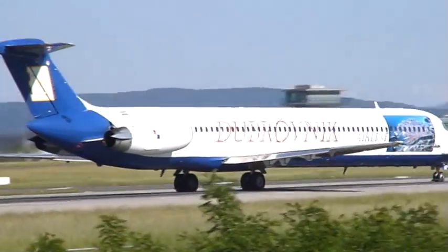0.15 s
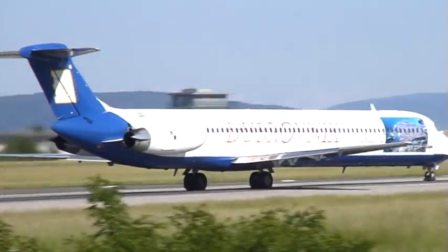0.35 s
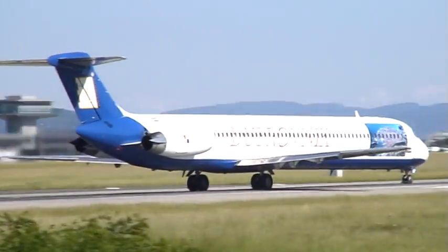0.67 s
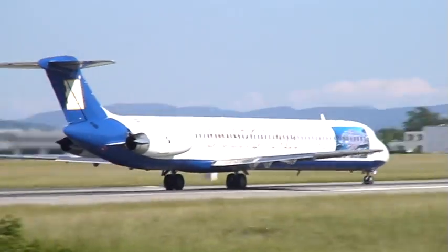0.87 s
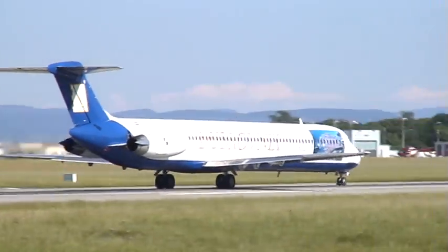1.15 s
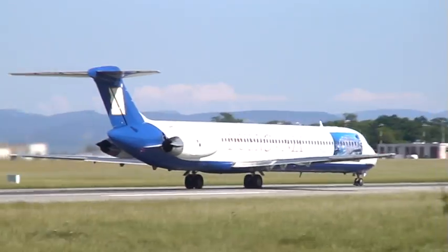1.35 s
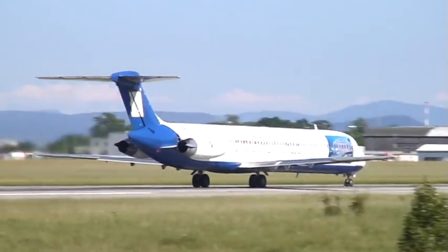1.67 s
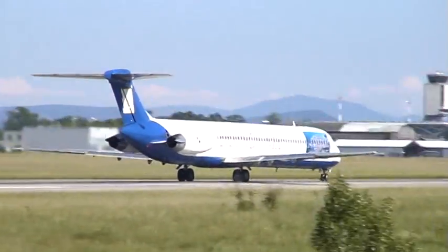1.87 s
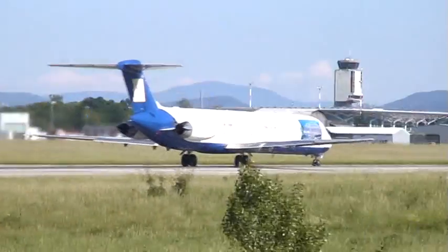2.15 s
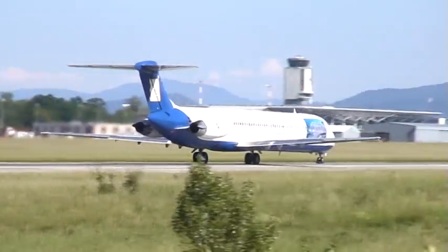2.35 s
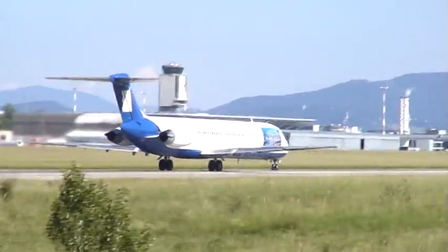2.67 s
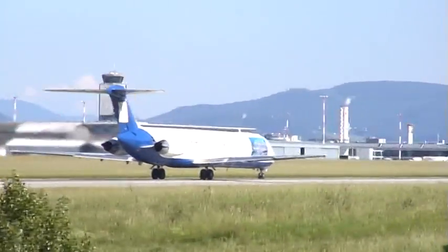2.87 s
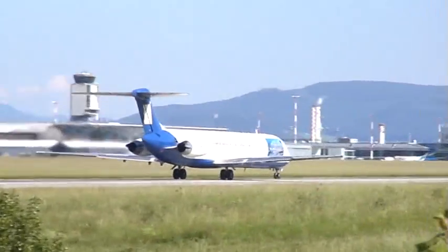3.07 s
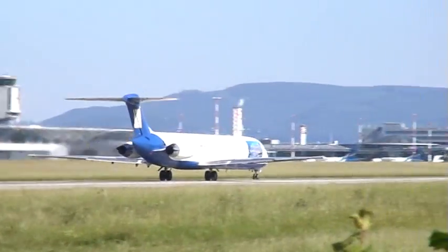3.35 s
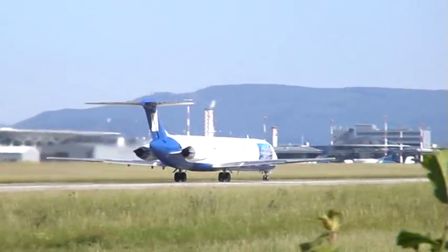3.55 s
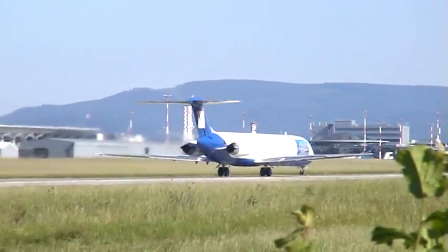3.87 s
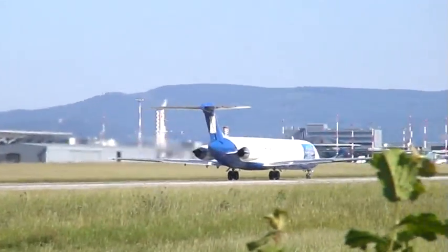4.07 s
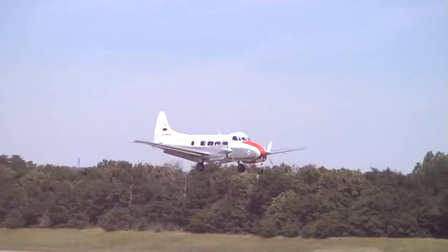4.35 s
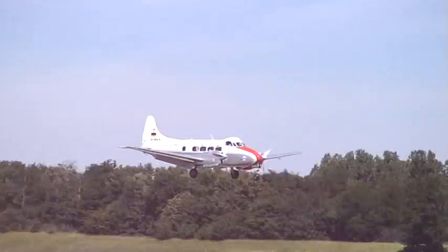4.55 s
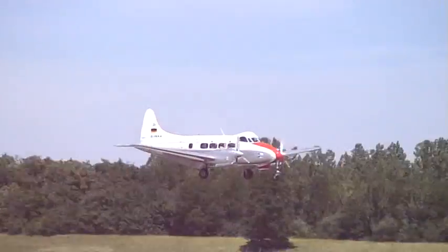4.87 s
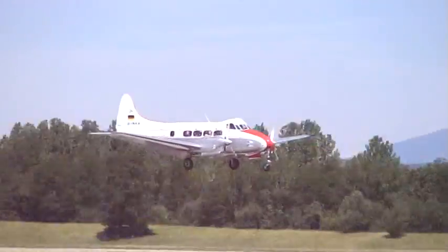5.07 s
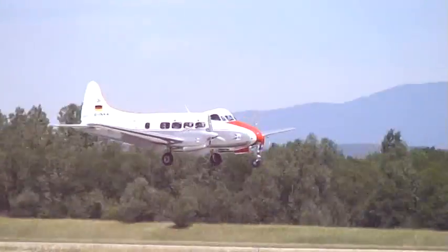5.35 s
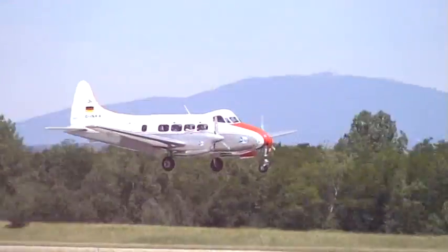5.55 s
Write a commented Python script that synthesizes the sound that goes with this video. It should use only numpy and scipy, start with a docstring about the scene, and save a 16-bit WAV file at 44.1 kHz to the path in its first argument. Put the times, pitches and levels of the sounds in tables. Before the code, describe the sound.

A jet airliner roars away down a runway, dulling into deep rumble, then a brief gap and a quieter propeller plane drones in with faint bird chirps.

```python
"""Departing jet, then a landing propeller plane

A twin-jet airliner rolls away down a runway: beamed bands of noise dull and the deep rumble grows as its tail turns this way.
After a moment of silence a six-cylinder propeller plane comes in to land: sine tones on its engine cycle plus puffing noise.
A small bird chirps nearby in gliding two-voiced sines, over a soft noise breeze and a short dry click."""
import sys
import numpy as np
from scipy import signal
from scipy.io import wavfile
from scipy.ndimage import uniform_filter1d, minimum_filter1d

SR = 44100
rng = np.random.default_rng(int(sys.argv[2]) if len(sys.argv) > 2 else 0)


def store_wav(level_fs):
    """Save 16-bit WAV to argv[1]."""
    pcm = np.round(np.clip(np.atleast_2d(level_fs), -1, 1) * 32767)
    wavfile.write(sys.argv[1], SR, pcm.T.astype(np.int16))


N = 251370
T = np.arange(N) / SR
JET_END_S, PLANE_START_S = 4.193, 4.2805


def from_db(db):
    """Decibels to gain."""
    return 10 ** (np.asarray(db) / 20)


def rms_one(x):
    """Scale to unit power."""
    return x / np.sqrt(np.mean(x ** 2) + 1e-20)


def in_time(rows):
    """Each column of a timed curve at every sample."""
    s, *columns = np.transpose(rows)
    return [np.interp(T, s, column) for column in columns]


def at_hz(points, hz):
    """Read a spectrum on a log-frequency axis."""
    table_hz, values = np.transpose(points)
    return np.interp(np.log(hz), np.log(table_hz), values)


def bump(offset, width):
    """A smooth hill of height 1."""
    return np.exp(-(offset / width) ** 2)


def drift(rate_hz):
    """Slow random wandering with spread 1, made at a hundredth of the sample rate."""
    pole = np.exp(-200 * np.pi * rate_hz / SR)
    white = rng.standard_normal(N // 100 + 1002)
    slow = signal.lfilter([1], [1, -2 * pole, pole * pole], white)[1000:]
    return np.interp(np.arange(N) / 100, np.arange(len(slow)), rms_one(slow))


def bands(lowest_hz, count):
    """Third-octave bands, each a pair of unrelated noises of equal power per Hz."""
    white = rng.standard_normal((2, 2, N + SR // 2))
    for k in range(count):
        low, high = lowest_hz * 2 ** (np.array([k, k + 1]) / 3)
        band = signal.butter(3, [low, high], "band", fs=SR, output="sos")
        # neighbouring bands draw on different noise; the filter's first half second is dropped
        yield np.sqrt(low * high), signal.sosfilt(band, white[k % 2])[..., -N:]


def pan(db):
    """Left and right gains for a left-minus-right level difference."""
    gains = from_db(np.array([[db], [-db]]) / 2)
    return gains / gains.mean()


def stereo(pair, alike, lead_s=0):
    """Mix two noises into left and right with a given likeness and lead of the left side."""
    alike = np.clip(alike, 0, .99)
    shared = np.sqrt((1 + alike) / 2) * pair[0]
    opposed = np.sqrt((1 - alike) / 2) * pair[1]
    left, right = shared + opposed, shared - opposed
    return np.array([left, np.roll(right, int(round(lead_s * SR)))])


def delayed(x, seconds):
    """The same sound a little later."""
    return np.array([np.interp(T - seconds, T, channel, left=0) for channel in x])


def evened(x, size):
    """Divide out the running loudness, so that the power stays even."""
    return x / np.sqrt(uniform_filter1d(np.mean(x ** 2, axis=0), size=size) + 1e-20)


def centred(db, heard):
    """A level relative to its mean while its scene is heard."""
    return db - np.mean(db[heard])


# Phase between the two microphone capsules. Each row: frequency in Hz, lead of the left in radians.
CAPSULE_PHASE = [(75, 1), (115, -1.88), (230, -1.21), (450, -1.06), (620, -0.069), (1000, -0.66),
                 (1400, 0.71), (1800, 0.54), (3300, -0.2)]


def capsule_lead(hz):
    """Seconds by which the left capsule leads at a frequency."""
    return at_hz(CAPSULE_PHASE, hz) / (2 * np.pi * hz)


# The airliner's path: distance to the runway, how far past it is at the start, its speed.
RUNWAY_M, PAST_M, SPEED_M_PER_S = 174, 78.4, 56.2


def rolling_away(beam_deg, width_deg):
    """Level change in dB of one exhaust beam as the airliner recedes and its tail turns this way."""
    along_m = PAST_M + SPEED_M_PER_S * T
    off_axis_deg = np.degrees(np.arctan2(RUNWAY_M, along_m))
    spreading_db = -20 * np.log10(np.hypot(RUNWAY_M, along_m))
    # the beam is 3 dB down at its width
    beam_db = -10 * np.log10(2) * ((off_axis_deg - beam_deg) / width_deg) ** 2
    return centred(spreading_db + beam_db, T < JET_END_S)


def hiss():
    """Faint, steady white noise under the airliner."""
    return from_db(-67.5) * stereo(rng.standard_normal((2, N)), alike=0.57)


# Colour of the moving air. Each row: frequency in Hz, relative level in dB per Hz.
BREEZE_COLOUR = [(20, -16), (36, -3), (55, -2), (85, -3), (140, 0), (280, -9.5)]
# Soft gusts on the field. Each row: centre in seconds, length in seconds, centre in Hz, lift in dB.
GUSTS = [(4.49, 0.1, 58, 14), (4.73, 0.062, 95, 11), (4.9, 0.07, 50, 7)]


def breeze(calm_db=-49.5):
    """Soft low rumble of moving air; each gust lifts its own part of the bass."""
    calm, out = 0, 0
    for hz, pair in bands(20.4, count=12):
        air = from_db(at_hz(BREEZE_COLOUR, hz)) * stereo(pair, 0.2)
        gust_db = 0
        for s, length, centre_hz, db in GUSTS:
            gust_db = gust_db + db * bump(T - s, length) * bump(np.log2(hz / centre_hz), 0.98)
        calm = calm + air
        out = out + from_db(gust_db) * air
    return from_db(calm_db) * out / np.std(calm)


# Short dry clicks; scene() mutes those before the propeller plane. Each row: start in seconds, level in dB.
CLICKS = [(2.2508, -49), (3.6765, -48), (5.6778, -39)]
# What they ring with. Each row: frequency in Hz, relative level in dB, 60 dB decay time in seconds.
CLICK_MODES = [(900, 8.5, 0.02), (4700, -1, 0.007), (6000, -4, 0.007), (7500, -4, 0.0068),
               (11700, -6, 0.004)]


def click(right_db=6, crack_db=-1.0, crack_t60_s=0.005):
    """Short dry clicks, each doubled: a noise crack over a few ringing modes."""
    out = np.zeros(N)
    age = np.arange(SR // 60) / SR
    highpass = signal.butter(2, 4000, "high", fs=SR, output="sos")
    for s, db in CLICKS:
        for delay_s, copy_db in [(0, 0), (0.0011, -2)]:
            crack = signal.sosfilt(highpass, rng.standard_normal(len(age)))
            crack = crack * from_db(crack_db - 60 * age / crack_t60_s)
            ring = sum(from_db(mode_db - 60 * age / t60_s) * np.sin(2 * np.pi * hz * age)
                       for hz, mode_db, t60_s in CLICK_MODES)
            burst = from_db(db + copy_db) * (ring + crack)
            out += np.interp(T - s - delay_s, age, burst, left=0, right=0)
    return out * pan(-right_db)


# Chirps on four-point pitch glides. Each row: start in seconds, length in seconds, start, top, low and end
# pitch in Hz, level in dB, warble spread in Hz, second voice in dB relative to the first.
CHIRPS = [(4.718, 0.046, 3680, 4750, 4320, 4200, -51, 40, -7),
          (4.807, 0.053, 3350, 4480, 4200, 4480, -44.5, 80, -17),
          (4.908, 0.027, 3500, 4180, 4060, 3900, -49, 110, -11),
          (5.126, .032, 5800, 6150, 5950, 5750, -58, 400, -14),
          (5.157, 0.041, 3950, 4780, 4450, 4250, -53.5, 70, -6),
          (5.237, 0.008, 4900, 5100, 5300, 5600, -52, 300, -14),
          (5.268, .026, 4300, 4250, 4050, 3800, -55, 260, -12)]
# The other side of the syrinx sings a little higher; the main voice has a faint octave.
SECOND_VOICE_RATIO, OCTAVE_DB = 1.15, -24


def bird(flutter_db=2.5, left_lag_s=.00005, echo_db=-9, echo_t60_s=.45):
    """Short two-voiced chirps with a rough warble, off to the right and scattered by the trees."""
    out = np.zeros(N)
    warble, flutter = drift(300), flutter_db * drift(120)
    for s, length, *contour_hz, db, warble_hz, second_db in CHIRPS:
        span = (T >= s) & (T < s + length)
        along = (T[span] - s) / length
        hz = np.interp(along, [0, .33, .72, 1], contour_hz) + warble_hz * warble[span]
        phase = 2 * np.pi * np.cumsum(hz) / SR
        voices = np.sin(phase) + from_db(OCTAVE_DB) * np.sin(2 * phase)
        voices = voices + from_db(second_db) * np.sin(SECOND_VOICE_RATIO * phase)
        envelope = np.abs(np.sin(np.pi * along ** 1.3)) ** 0.5
        out[span] += from_db(db + flutter[span]) * np.sqrt(2) * envelope * voices
    # decaying noise of unit energy stands for the scattering
    scatter = rng.standard_normal((2, SR // 2)) * from_db(-60 * T[:SR // 2] / echo_t60_s)
    scatter = scatter / np.linalg.norm(scatter, axis=1, keepdims=True)
    direct = np.array([delayed([out], left_lag_s)[0], out]) * pan(-0.97)
    return direct + from_db(echo_db) * signal.fftconvolve(out[None], scatter, axes=1)[:, :N]


# Wind thuds on the microphone. Each row: centre in seconds, length in seconds, relative level in dB.
THUDS = [(0.31, 0.085, -19), (1.035, 0.039, -15), (2.587, 0.09, -22), (3.46, 0.086, -14)]


def buffeting(steady_db=-36, left_db=11):
    """Wind thuds softly on the microphone beside the runway: evened bass noise pushed up by each thud."""
    out = sum(stereo(pair, 0.79) for _, pair in bands(26, count=3))
    push = from_db(steady_db) + sum(from_db(db) * bump(T - s, length) for s, length, db in THUDS)
    return push * evened(out, 5000) * pan(left_db) / 2


# Centre of the boom. Each row: time in seconds, frequency in Hz.
BOOM_PITCH = [(0.5, 72), (1.4, 71.4), (1.8, 79.98), (2.3, 84.35), (2.75, 73.28), (3.4, 64.94),
              (3.85, 63.17), (4.1, 72)]


def boom(level_db=-25, width_hz=18, left_db=18):
    """The heart of the rumble: a narrow noise band whose centre climbs, then sinks, then rises at the end."""
    phase = 2 * np.pi * np.cumsum(in_time(BOOM_PITCH)[0]) / SR
    narrow = drift(width_hz) * np.cos(phase) + drift(width_hz) * np.sin(phase)
    return from_db(level_db) * narrow * pan(left_db) / 2


# Colour of the rumble on each side. Each row: frequency in Hz, relative level in dB per Hz.
RUMBLE_LEFT = [(20, -26.5), (32, -1.5), (50, -4), (66, 1.5), (85, -1.5), (105, -9), (150, -25.5),
               (300, -34.5)]
RUMBLE_RIGHT = [(20, -23), (40, -10), (80, -14.5), (125, -8.5), (170, -15.5), (230, -20.5), (300, -23)]
# Stereo width of the rumble. Each row: frequency in Hz, left-right likeness from 0 to 1.
RUMBLE_LIKENESS = [(22, 0.45), (45, 0.62), (65, 1), (100, 0.05), (250, 0.14)]
# The rumble surges and sags. Each row: centre in seconds, length in seconds, level change in dB.
SURGES = [(0.75, 0.08, 0.5), (2.037, 0.02, 4.5), (2.63, 0.1, 2.5), (2.92, 0.028, -4.5), (3.923, 0.13, 3),
          (4.14, 0.03, -1)]
RUMBLE_BEAM_DEG, RUMBLE_WIDTH_DEG = 9.5, 21.1


def rumble(level_db=-17):
    """Deep, lumpy noise that grows behind the engines; the left side booms near 70 Hz."""
    out = boom()
    for hz, pair in bands(18.67, count=12):
        sides_db = [[at_hz(RUMBLE_LEFT, hz)], [at_hz(RUMBLE_RIGHT, hz)]]
        out = out + from_db(sides_db) * stereo(pair, at_hz(RUMBLE_LIKENESS, hz), capsule_lead(hz))
    surge_db = sum(db * bump(T - s, length) for s, length, db in SURGES)
    path_db = rolling_away(RUMBLE_BEAM_DEG, RUMBLE_WIDTH_DEG)
    return from_db(level_db + surge_db + path_db) * evened(out, 7000)


# Exhaust rasp and propeller wash, levels before centring.
# Each row: time in seconds, level of the middle in dB, level of the treble in dB.
RASP = [(4.3, -47.5, -53), (4.42, -45, -55), (4.57, -49, -53.5), (4.84, -48, -47.5), (5.11, -47, -53.5),
        (5.2, -44.5, -48.5), (5.34, -39, -52.5), (5.38, -43, -50.5), (5.66, -39.5, -48)]
# Colour of the rasp. Each row: frequency in Hz, relative level in dB per Hz.
RASP_COLOUR = [(260, -3), (400, -2.5), (520, -1), (660, -4), (1030, -4), (1300, -10.5), (1640, -6),
               (2070, -8), (2600, -12.5), (3280, -11.5), (4300, -19.5), (6500, -23), (9000, -36.5),
               (13000, -37.5)]
# Stereo width of the rasp. Each row: frequency in Hz, left-right likeness from 0 to 1.
RASP_LIKENESS = [(250, 0.76), (1000, 0.75), (2800, 0.76), (4000, 0.54), (9000, 0.37)]


def rasp(cycles, level_db=-32, throb=0.11, patchy_db=1.5):
    """Each firing lets out a puff of noise over the steady wash of the propellers."""
    middle_db, treble_db = (centred(db, T > PLANE_START_S) for db in in_time(RASP))
    # less air in the way as the plane nears: the top opens up
    opening_db = np.interp(T, [5.0, 5.7], [0, 4.0])
    out = 0
    for hz, pair in bands(220.0, count=18):
        treble_share = at_hz([(900, 0.1), (1700, 0.93)], hz)
        opening_share = at_hz([(3500, 0.14), (7000, 0.74)], hz)
        tilt_db = treble_share * (treble_db - middle_db) + opening_share * opening_db
        gain = from_db(at_hz(RASP_COLOUR, hz) + tilt_db + patchy_db * drift(33))
        out = out + gain * stereo(pair, at_hz(RASP_LIKENESS, hz))
    # six firings per four-stroke cycle
    puffs = 1 + throb * np.cos(2 * np.pi * 6 * cycles)
    return from_db(middle_db + level_db) * out * puffs


# Strongest exhaust tone, twice the firing rate, sinking as the plane draws level.
# Each row: time in seconds, frequency in Hz.
ENGINE_PITCH = [(4.3, 220.4), (4.65, 220.4), (4.9, 219.6), (5.15, 219.0), (5.33, 217.8), (5.5, 216.3),
                (5.68, 214.8)]


def engine_cycles():
    """Running count of four-stroke cycles; the strongest tone is the twelfth multiple of their rate."""
    return np.cumsum(in_time(ENGINE_PITCH)[0]) / SR / 12


# The four loudest exhaust tones, swelling and fading in turn. Each row: time in seconds,
# firing tone in dB, its fifth in dB, its octave in dB, its twelfth in dB.
DRONE = [(4.3, -41, -61, -45, -64), (4.52, -45, -55, -50.5, -53), (4.66, -51, -55, -48, -53),
         (4.85, -45.5, -51, -44.5, -50), (5.04, -56, -50, -42.5, -55), (5.2, -48, -49, -44, -55),
         (5.42, -52.5, -49, -41, -55), (5.58, -43, -46, -42.5, -53), (5.68, -46, -45, -41, -53)]
# Their places in the series, as multiples of the four-stroke cycle.
DRONE_MULTIPLES = (6, 9, 12, 18)
# Weaker tones from unequal cylinders, before their waver.
# Each row: multiple of the four-stroke cycle, level far off in dB, level close by in dB.
CYCLE_TONES = [(3, -60, -56), (11, -59, -59), (14, -61, -57), (15, -62, -53.5), (16, -64, -62),
               (17, -57.5, -61), (27, -72.5, -50), (30, -60.5, -60), (32, -60.5, -56), (34, -62, -51.5),
               (35, -72, -53), (38, -64, -53), (39, -68, -54), (40, -59, -57), (41, -63, -53.5),
               (43, -66, -60), (47, -66, -60)]
# The plane's approach. Each row: time in seconds, nearness from 0 far off to 1 close by.
NEARNESS = [(4.3, 0), (4.65, 0), (4.95, 0.46), (5.15, 0.63), (5.33, 1), (5.68, 0.86)]
# The growl fills in the other cycle tones: dB per tone before colour and waver.
GROWL_FAR_DB, GROWL_NEAR_DB = -69.5, -63.5
# Colour of the growl. Each row: frequency in Hz, level change in dB.
GROWL_COLOUR = [(240, -1), (350, -4), (450, 1.5), (560, -4), (680, 4.5), (800, -1), (950, -2), (1150, -3),
                (1300, -8)]


def engine_tones(cycles, waver_db=1.0, blade_db=-56, blade_waver_db=-1.0):
    """Exhaust tones on multiples of the four-stroke cycle, and the beat of the geared three-blade propeller."""
    heard = T > PLANE_START_S

    def tone(multiple, db):
        """One sine with a slightly wandering phase."""
        phase = 2 * np.pi * (multiple * cycles[heard] + rng.random()) + .15 * drift(4)[heard]
        return np.sqrt(2) * from_db(db[heard]) * np.sin(phase)

    near, = in_time(NEARNESS)
    mean_cycle_hz = cycles[-1] / T[-1]
    growl_db = GROWL_FAR_DB + near * (GROWL_NEAR_DB - GROWL_FAR_DB)
    levels_db = {k: growl_db + at_hz(GROWL_COLOUR, mean_cycle_hz * k) for k in range(13, 66)}
    # the tones of unequal cylinders replace the growl at their multiples
    for k, far_db, near_db in CYCLE_TONES:
        levels_db[round(k)] = far_db + near * (near_db - far_db)
    weak = sum(tone(k, db + waver_db * drift(2)) for k, db in levels_db.items() if k not in DRONE_MULTIPLES)
    loud = sum(tone(k, db) for k, db in zip(DRONE_MULTIPLES, in_time(DRONE)))
    blades_per_cycle = 4.27
    blades = tone(blades_per_cycle, blade_db + blade_waver_db * drift(2))
    out = np.zeros(N)
    out[heard] = loud + weak + blades
    return out


# Middle of the roar, swelling and fading in the wind. Each row: time in seconds, level in dB before centring.
ROAR = [(0.02, -27), (0.13, -28.5), (0.17, -33), (0.27, -29.5), (0.67, -29), (0.8, -31.5), (0.9, -32.5),
        (0.98, -35), (1.05, -32.5), (1.09, -36.5), (1.18, -32), (1.28, -31), (1.59, -29), (1.63, -34),
        (1.71, -29), (1.78, -36.5), (1.87, -32.5), (2.1, -37), (2.3, -34), (2.36, -39), (2.57, -37.5),
        (2.66, -42.5), (2.78, -39), (2.845, -38.5), (2.88, -43), (2.99, -40), (3.06, -42.5), (3.5, -40),
        (3.62, -39), (4.0, -42.5), (4.07, -45), (4.16, -42)]
# Low notes ride through the wind, high ones fade with it. Each row: frequency in Hz, share of the fading.
FADING_SHARE = [(170, 0.18), (400, 0.57), (800, 1.06), (2000, 0.81), (7000, 1)]
# The exhaust beams lows backwards and highs sideways.
# Each row: frequency in Hz, loudest angle off the jet's axis in degrees.
BEAM = [(120, 53.5), (220, 47.7), (400, 67.3), (800, 54.2), (1600, 62), (3000, 66), (5000, 78.4),
        (8500, 106.5)]
# The beam is narrowest for the low growl.
# Each row: frequency in Hz, degrees from the loudest direction at which it is 3 dB down.
BEAM_WIDTH = [(220, 14.5), (400, 21.5), (3000, 22), (8000, 22.5)]
# Parts of the roar swell or thin for a while.
# Each row: centre in seconds, length in seconds, centre in Hz, level change in dB.
SWELLS = [(0.655, 0.043, 950, 11), (1.525, 0.074, 1870, 8), (1.32, 0.088, 1950, 3), (3.18, 0.079, 853, 12),
          (3.42, 0.08, 1400, 5), (0.1, 0.28, 180, 9.5), (2.3, 0.33, 236, 3), (0.09, 0.053, 720, 10.5),
          (0.93, 0.068, 200, 4), (1.75, 0.13, 180, 4.5), (3.385, 0.048, 350, 8), (4.08, 0.057, 140, 4.5),
          (3.7, 0.92, 575, -3.5), (1.75, 0.55, 5500, 2.5), (1.7, 0.64, 9000, 1.5)]
# Sound off the ground cancels one low band and lifts its octave; both climb with distance.
# Each row: time in seconds, frequency of the dip in Hz.
GROUND_DIP = [(0, 99), (1.5, 110), (2.4, 141), (3.2, 190), (4.2, 195)]
# Colour of the roar. Each row: frequency in Hz, relative level in dB per Hz.
JET_COLOUR = [(105, 4), (170, 8), (290, 5), (520, -2.5), (800, -1), (1250, -6.5), (1630, -8.5), (2050, -8),
              (2590, -16), (3260, -17), (4100, -23), (5200, -27.5), (6500, -34.5), (8500, -50),
              (11000, -65), (13000, -68)]
# Stereo width of the roar. Each row: frequency in Hz, left-right likeness from 0 to 1.
JET_LIKENESS = [(120, 0.27), (180, 0.79), (280, 0.93), (450, 1), (800, 0.85), (3500, 0.81), (8000, 0.5)]
# Stereo balance of the roar. Each row: frequency in Hz, left minus right in dB.
JET_BALANCE = [(170, 13.5), (300, 4.5), (510, -0.5), (780, 4.5), (1150, -2.5), (1600, 4.5), (2600, 0.5),
               (4000, 3.5), (7500, 1)]


def jet(level_db=-11.5, flutter_db=0.5, patchy_db=1.3, dip_db=-7, lift_db=1.5):
    """Exhaust mixing noise; turbulent air makes it flutter, and the treble fades as the tail turns this way."""
    roar_db, = in_time(ROAR)
    # the roar's swelling and fading, apart from its slow change along the path
    middle_path_db = rolling_away(at_hz(BEAM, 2200), at_hz(BEAM_WIDTH, 2200))
    fading_db = centred(roar_db, T < JET_END_S) - middle_path_db
    dip_hz, = in_time(GROUND_DIP)
    out, together, below = 0, drift(3.1), drift(9)
    for hz, pair in bands(90.5, count=21):
        # each part of the spectrum leaves the nozzles at its own angle
        path_db = rolling_away(at_hz(BEAM, hz), at_hz(BEAM_WIDTH, hz))
        # neighbouring bands share part of their flutter
        own = drift(5.3)
        patches_db = patchy_db * (own + below) / np.sqrt(2)
        below = own
        air_db = at_hz(FADING_SHARE, hz) * (fading_db + flutter_db * together + patches_db)
        swell_db = 0
        for s, length, centre_hz, db in SWELLS:
            swell_db = swell_db + db * bump(np.log2(hz / centre_hz), 0.17) * bump(T - s, length)
        octaves = np.log2(hz / dip_hz)
        ground_db = dip_db * bump(octaves, 0.23) + lift_db * bump(octaves - 1, 0.3)
        gain = from_db(level_db + at_hz(JET_COLOUR, hz) + path_db + air_db + swell_db + ground_db)
        sides = stereo(pair, at_hz(JET_LIKENESS, hz), capsule_lead(hz))
        out = out + gain * sides * pan(at_hz(JET_BALANCE, hz))
    # a close reflection ripples the treble
    bright = signal.sosfilt(signal.butter(1, 3000, "high", fs=SR, output="sos"), out)
    return out + .3 * delayed(bright, .00079)


def scene():
    """The jet scene fades out quickly; after a silent gap the propeller scene starts at once."""
    cycles = engine_cycles()
    roar_fade = np.clip((JET_END_S - T) / 0.022, 0, 1)
    bass_fade = np.clip((JET_END_S - T) / 0.053, 0, 1)
    plane_start = np.clip((T - PLANE_START_S) / .001, 0, 1)
    airliner = (hiss() + jet()) * roar_fade + (buffeting() + rumble()) * bass_fade
    plane = breeze() + click() + bird() + (rasp(cycles) + engine_tones(cycles)) * pan(3.1)
    return airliner + plane * plane_start


def record(dry, cutoff_hz=12900):
    """A limiter holds down the biggest surges; the top is cut steeply."""
    allowed = np.minimum(1, .75 / (np.abs(dry).max(axis=0) + 1e-9))
    gain = uniform_filter1d(minimum_filter1d(allowed, size=400), size=400)
    steep = signal.ellip(10, .2, 80, cutoff_hz, fs=SR, output="sos")
    return signal.sosfilt(steep, dry * gain)


dry = scene()
out = record(dry)
store_wav(out)
```